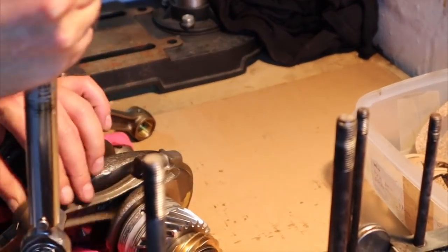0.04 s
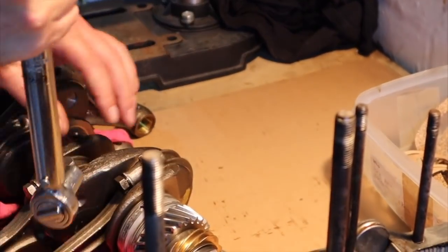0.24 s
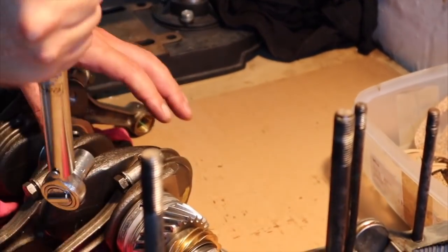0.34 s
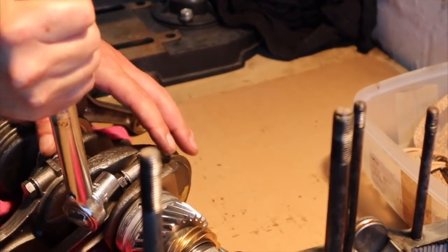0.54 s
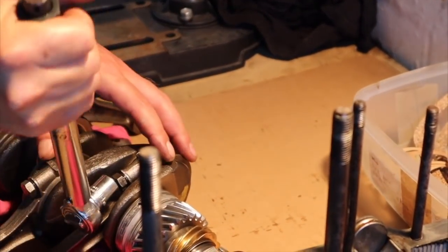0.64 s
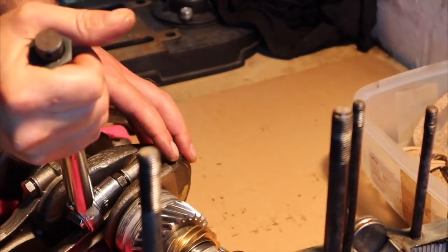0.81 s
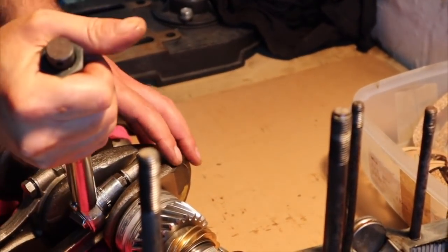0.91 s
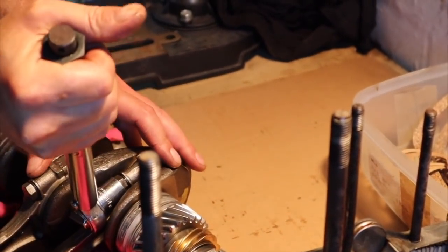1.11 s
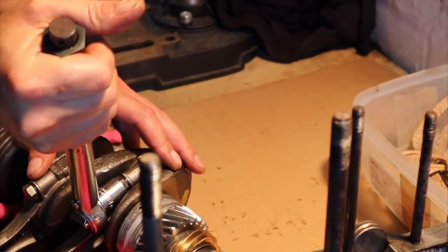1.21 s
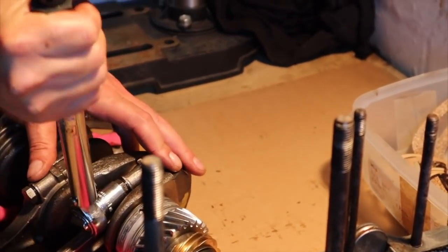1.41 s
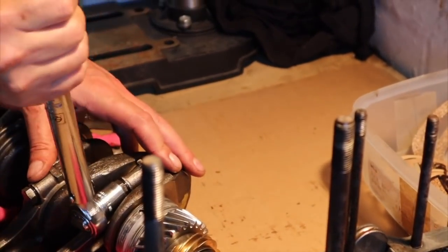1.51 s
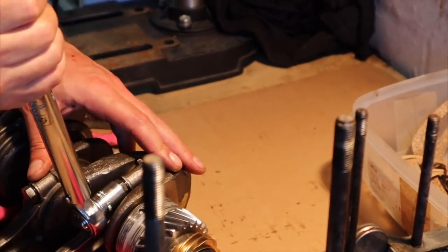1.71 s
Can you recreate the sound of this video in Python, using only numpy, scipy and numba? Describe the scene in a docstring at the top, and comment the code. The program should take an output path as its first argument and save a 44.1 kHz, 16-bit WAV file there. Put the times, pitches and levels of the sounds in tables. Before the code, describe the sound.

Loud metallic thud and bounce on a workbench, cardboard scrapes, then sharp wrench clicks and faint taps

```python
"""A small workshop hums and hisses; something slides over cardboard, as grains of coloured noise.
A heavy steel part drops on the cardboard-covered bench and bounces: damped modes, boom and clack.
The close microphone overloads on the thud and ducks briefly; the sliding goes on.
A torque wrench is set on a nut: pawl ticks, sharp steel clicks, soft nudges of the bench and duller
socket taps interleave, made of short modes and noise bursts; the last faint taps come alone."""
import sys
import numpy as np
from scipy import signal
from scipy.fft import rfft, irfft
from scipy.io import wavfile
from numba import njit

SR = 44100
rng = np.random.default_rng(int(sys.argv[2]) if len(sys.argv) > 2 else 0)


def materialize(psi):
    """Save the field psi as 16-bit PCM at rate SR to the path in sys.argv[1].

    A 1-D psi becomes a single channel; in a 2-D psi each row is a channel.
    """
    bounded = np.clip(np.atleast_2d(psi).T, -1, 1)
    quanta = np.round(bounded * 32767).astype(np.int16)
    wavfile.write(sys.argv[1], SR, quanta)


N = 77175


def amp(db):
    """Amplitude factor from dB."""
    return 10 ** (np.asarray(db) / 20)


def fade(t60_s):
    """Exponential decay of 60 dB in t60_s."""
    return np.exp(-np.log(1000) * np.arange(N) / SR / t60_s)


def colour(x, points):
    """Shape x to a relative spectrum of (f/Hz, level/dB) points, at rms 1."""
    hz, db = np.array(points, float).T
    f_hz = np.maximum(np.fft.rfftfreq(N, 1 / SR), 1)
    below = np.minimum(f_hz / hz[0], 1) ** 2  # 12 dB/octave fall under the first point
    shape = amp(np.interp(np.log(f_hz), np.log(hz), db))
    y = irfft(rfft(x) * below * shape, N)
    return y / np.std(y)


def noise(points):
    """Coloured Gaussian noise at rms 1."""
    return colour(rng.standard_normal(N), points)


def ring(modes):
    """Sum of damped modes, each building up over its rise time, pitch scattered by 0.24 % rms."""
    t_s = np.arange(N) / SR
    out = np.zeros(N)
    for hz, db, t60_s, rise_s in modes:
        mode_hz = hz * (1 + 0.0024 * rng.standard_normal())
        build = 1 - np.exp(-(t_s / rise_s) ** 2)
        out += amp(db) * np.sin(2 * np.pi * mode_hz * t_s) * fade(t60_s) * build
    return out


def soften(x, contact_ms):
    """Low-pass at 1 / (2 * contact time): a longer contact takes the treble out of a blow."""
    cutoff_hz = min(1000 / (2 * contact_ms), SR / 2 - 1000)
    return signal.sosfilt(signal.butter(2, cutoff_hz, fs=SR, output="sos"), x)


def add(out, at_s, x):
    """Mix x into out from at_s."""
    i = max(int(at_s * SR), 0)
    out[i:] += x[:N - i]


# room noise spectrum: f/Hz, relative level/dB
SHOP_SPECTRUM = [(30, -11), (60, -11), (90, -7), (130, -12), (200, -10.5), (247, -7), (320, -16.5),
                 (370, -14.5), (500, -10.5), (765, -10.5), (985, -8), (1350, -15), (1670, -21),
                 (2420, -27.5), (5060, -32.5), (8000, -37), (15000, -38.5), (16000, -44)]
SHOP_RMS_DB, HUM_HZ, HUM_RMS_DB, OCTAVE_RMS_DB = -44, 50, -48.5, -69.5


def workshop():
    """Steady room noise with a mains hum and its octave as sines."""
    turn = 2 * np.pi * HUM_HZ * np.arange(N) / SR
    hum = amp(HUM_RMS_DB) * np.sin(turn) + amp(OCTAVE_RMS_DB) * np.sin(2 * turn)
    return amp(SHOP_RMS_DB) * noise(SHOP_SPECTRUM) + np.sqrt(2) * hum


# strokes over cardboard: start t/s, peak t/s, end t/s, level/dB, centre f/Hz
STROKES = [(0.026, .05, .11, -42.5, 1470), (0.057, 0.18, 0.21, -45.5, 5540), (0.21, 0.264, 0.3, -37, 2100),
           (0.36, 0.407, 0.59, -46.5, 2590), (.44, 0.474, 0.62, -33.5, 2700),
           (0.488, 0.536, 0.6, -27.5, 1655)]
# cardboard rub spectrum: f/Hz, relative level/dB
RUB_SPECTRUM = [(100, -17), (600, -4.5), (950, 3), (1400, 1.5), (2500, -5), (3900, -6.5), (4700, -11.5),
                (6200, -13), (8000, -22), (12000, -22.5), (16000, -33)]
# snags in the slide: t/s, level/dB
SNAG_EVENTS = [(0.458, -46), (0.459, -42), (0.475, -39)]
RUB_FOCUS_DB, GRAINS_PER_S = 4, 12000  # focus: scales the fall away from the centre
GRAIN_SPREAD_DB = 0  # extra level scatter of the grains; 0 = none


def slides():
    """Cardboard fibres catch and let go in dense grains that swell and die with each stroke."""
    out, t_s = np.zeros(N), np.arange(N) / SR
    for start_s, peak_s, end_s, db, centre_hz in STROKES:
        catches = rng.random(N) < GRAINS_PER_S / SR
        grains = catches * rng.standard_normal(N)
        grains *= amp(GRAIN_SPREAD_DB * np.minimum(rng.exponential(size=N), 4))
        spectrum = []
        for hz, level_db in RUB_SPECTRUM:
            octaves = np.log2(hz / centre_hz)
            fall_db = RUB_FOCUS_DB * octaves ** 2 / (1 + abs(octaves) / 2)
            spectrum.append((hz, level_db - fall_db))
        swell = np.interp(t_s, [start_s, peak_s, end_s], [0, 1, 0]) ** 1.15
        out += amp(db) * swell * colour(grains, spectrum)
    for at_s, db in SNAG_EVENTS:
        add(out, at_s, amp(db) * noise(RUB_SPECTRUM) * fade(0.011))
    return out


BENCH_LOW_HZ = 59.4


def bench_radiation(x):
    """High-pass: the bench top radiates little below BENCH_LOW_HZ."""
    return signal.sosfilt(signal.butter(2, BENCH_LOW_HZ, "high", fs=SR, output="sos"), x)


# bounces of the steel part: t/s, bench level/dB, contact/ms, clack level/dB
BOUNCE_EVENTS = [(0.1981, 0.5, 0.49, -15), (.2640, -21, 0.61, -60), (0.2835, -8.5, 0.62, -28),
                 (0.3307, -19, 0.69, -35.5), (0.3576, -18.5, 1.4, -46)]
# bench modes: f/Hz, relative level/dB, T60/s, rise/s
BENCH_MODES = [(83.3, -25.5, 0.75, 0.01), (99.3, -18.5, 0.68, 0.018), (138.4, -13.5, 0.28, 0.012),
               (182.3, -18.5, 0.34, 0.0038), (206, 15, 0.027, 0.0066), (255, -8.5, 0.083, 0.00069),
               (289, -10, 0.15, 0.0014), (376, -28, 0.51, 0.0012), (431, -10.5, 0.072, 0.00086),
               (536.3, -20.5, 0.26, 0.0016), (534, 6.5, 0.016, 0.00018), (681, -13.5, 0.079, 0.0011),
               (912, -23, 0.17, 0.00098), (1063, -24.5, 0.21, 0.00059)]
# steel part modes: f/Hz, relative level/dB, T60/s, rise/s
STEEL_MODES = [(1850, -10, .04, .0002), (2277, -20.5, 0.15, .0002), (3530, -5.5, 0.021, 0.00016),
               (4570, 0, 0.016, 0.00061), (5110, -23.5, 0.11, 0.00023), (5530, -6.5, 0.021, 0.00027),
               (6860, -15.5, 0.03, 0.00017)]
# boom of the bench in the room: f/Hz, relative level/dB
BOOM_SPECTRUM = [(30, -40), (60, -37), (95, -5.5), (200, -10.5), (330, -12.5), (550, -25), (800, -23),
                 (1100, -20), (1600, -28), (5000, -32.5), (8000, -61), (16000, -78)]
# clack of the steel: f/Hz, relative level/dB
CLACK_SPECTRUM = [(200, -20), (1000, 16), (2200, -5), (3000, -24), (4500, 3), (5600, -21), (7000, -16),
                  (11000, -11.5), (16000, -17)]
# room tail of the steel sounds: f/Hz, relative level/dB
TAIL_SPECTRUM = [(100, 12.5), (600, 2.5), (1500, 6), (2200, 1.5), (3000, -1), (4200, -3), (5600, 0),
                 (7000, -24), (10000, -27), (16000, -43)]
BOOM_DB, BOOM_T60_S, CLACK_T60_S = -14.5, 0.37, 0.025
SNAP_DB, SNAP_T60_S = -1, 0.0019  # pressure step of the first, hardest contact


def steel_drop():
    """The part lands and bounces: contact-softened bench modes and boom, plus bright steel clack."""
    out = np.zeros(N)
    add(out, BOUNCE_EVENTS[0][0], amp(SNAP_DB) * fade(SNAP_T60_S))
    for at_s, bench_db, contact_ms, clack_db in BOUNCE_EVENTS:
        body = ring(BENCH_MODES) + amp(BOOM_DB) * noise(BOOM_SPECTRUM) * fade(BOOM_T60_S)
        clack = amp(0.5) * ring(STEEL_MODES)
        clack += amp(1.5) * noise(CLACK_SPECTRUM) * fade(CLACK_T60_S)
        clack += amp(-5.5) * noise(TAIL_SPECTRUM) * fade(0.096)
        add(out, at_s, amp(bench_db) * soften(body, contact_ms) + amp(clack_db) * clack)
    return bench_radiation(out)


# dense ring of the surrounding metal: f/Hz, relative level/dB
CRACK_SPECTRUM = [(100, -8), (600, -0.5), (1300, -3), (2100, -3.5), (3000, 1), (4200, -9), (5700, -7),
                  (7000, -7.5), (10000, -11.5), (16000, -40)]
CRACK_T60_S, TAIL_T60_S, CRACK_RISE_S = 0.04, 0.49, 0.00017


def clicks(events, modes, crack_db, tail_db):
    """Steel snaps on steel: short modes, a dense crack and a faint room tail."""
    out = np.zeros(N)
    build = 1 - np.exp(-np.arange(N) / SR / CRACK_RISE_S)
    for at_s, db, contact_ms in events:
        crack = amp(crack_db) * noise(CRACK_SPECTRUM) * fade(CRACK_T60_S)
        tail = amp(tail_db) * noise(TAIL_SPECTRUM) * fade(TAIL_T60_S)
        blow = ring(modes) + build * (crack + tail)
        add(out, at_s, amp(db) * soften(blow, contact_ms))
    return out


# ratchet pawl ticks: t/s, level/dB, contact/ms
PAWL_EVENTS = [(.7933, -24.5, 0.032), (.8162, -22.5, 0.086), (.9835, -46, 0.065)]
# pawl modes: f/Hz, relative level/dB, T60/s, rise/s
PAWL_MODES = [(3260, -1, 0.01, .0002), (3440, -9, 0.021, .0002), (3570, -15.5, 0.08, .0002),
              (5400, -3.5, 0.013, 0.00023), (5570, -8, 0.038, 0.00022), (6600, -7, 0.011, 0.00016),
              (7480, -27, 0.029, .0002)]


def pawl_ticks():
    """The ratchet pawl strikes steel: high, short modes with little crack."""
    return clicks(PAWL_EVENTS, PAWL_MODES, crack_db=-13, tail_db=-31)


# wrench and socket clicks: t/s, level/dB, contact/ms
WRENCH_EVENTS = [(.8034, -28, 0.031), (.9486, -21, 0.06)]
# wrench modes: f/Hz, relative level/dB, T60/s, rise/s
WRENCH_MODES = [(975, -9, .06, 0.0046), (1287, -7.5, 0.09, 0.0044), (1680, -30.5, 1, .001),
                (2570, -14, 0.034, .0004), (2606, -5.5, 0.052, 0.00034), (2936, -18.5, 0.17, .0004),
                (3630, -16, 0.05, 0.00024), (4560, -6, 0.024, 0.00036), (5400, -2.5, 0.019, 0.00042),
                (6120, -10, 0.013, .0003), (7570, -13, .02, .0003)]


def wrench_clicks():
    """Wrench and socket snap: wide-range modes under a strong crack."""
    return clicks(WRENCH_EVENTS, WRENCH_MODES, crack_db=-3.5, tail_db=-18)


# soft knocks of the work against the bench: t/s, level/dB, contact/ms
NUDGE_EVENTS = [(0.813, -29, 4.7), (0.828, -38, 2.1)]


def nudges():
    """The work knocks the bench: boom noise dulled by a long contact."""
    out = np.zeros(N)
    for at_s, db, contact_ms in NUDGE_EVENTS:
        add(out, at_s, amp(db) * soften(noise(BOOM_SPECTRUM) * fade(0.29), contact_ms))
    return bench_radiation(out)


# socket taps on the nut: t/s, level/dB, contact/ms
SOCKET_EVENTS = [(.8539, -26, 0.16), (1.2865, -35.5, 0.16), (1.2915, -36, .2), (1.7225, -40, .17)]
# socket modes: f/Hz, relative level/dB, T60/s, rise/s
SOCKET_MODES = [(524, -13, 0.036, .0005), (1230, -10, 0.022, 0.00077), (1840, -15, .02, 0.00034),
                (2680, -1, 0.013, 0.00021), (3200, -1, 0.011, 0.00039), (3310, -19, .035, .0003),
                (5500, -11, .022, .0002)]


def socket_taps():
    """The socket taps the nut: longer contacts, so duller than the clicks."""
    return clicks(SOCKET_EVENTS, SOCKET_MODES, crack_db=-8.5, tail_db=-25)


def scene():
    """Wrench, bench, cardboard and room summed at one close microphone."""
    wrench_work = pawl_ticks() + wrench_clicks() + socket_taps()
    bench = steel_drop() + nudges()
    return (wrench_work + bench + slides() + workshop())[None]


@njit
def follow(x, attack, release):
    """One-pole level follower, quick to rise and slow to fall."""
    out, level = np.empty(len(x)), 0.
    for i in range(len(x)):
        level += (x[i] - level) * (attack if x[i] > level else release)
        out[i] = level
    return out


DUCK_ABOVE_DB, DUCK_SLOPE = -18, 0.6  # slope: dB of cut per dB over
DUCK_ATTACK_S, DUCK_RELEASE_S = 0.021, 0.058
TOP_HZ = 16000


def record(dry):
    """Gain control ducks as its level follower rises, the peaks clip and the top is cut."""
    loudness = follow(np.abs(dry[0]), 1 / (DUCK_ATTACK_S * SR), 1 / (DUCK_RELEASE_S * SR))
    gain = np.maximum(loudness / amp(DUCK_ABOVE_DB), 1) ** -DUCK_SLOPE
    clipped = np.clip(dry * gain, -1, 1)
    return signal.sosfilt(signal.ellip(8, .2, 70, TOP_HZ, fs=SR, output="sos"), clipped)


dry = scene()
out = record(dry)
materialize(out)
```